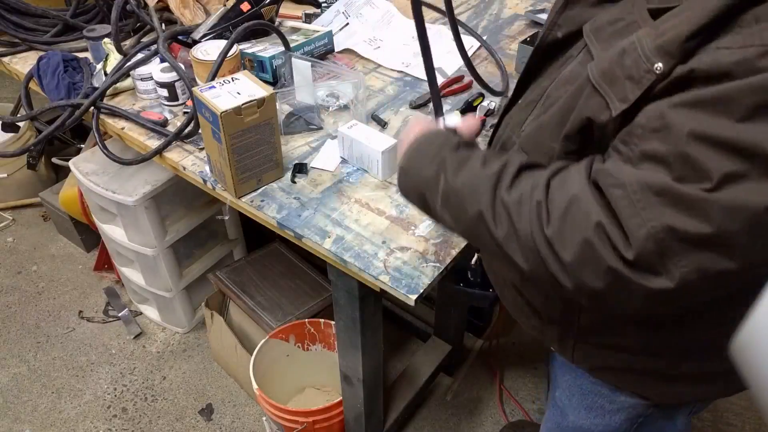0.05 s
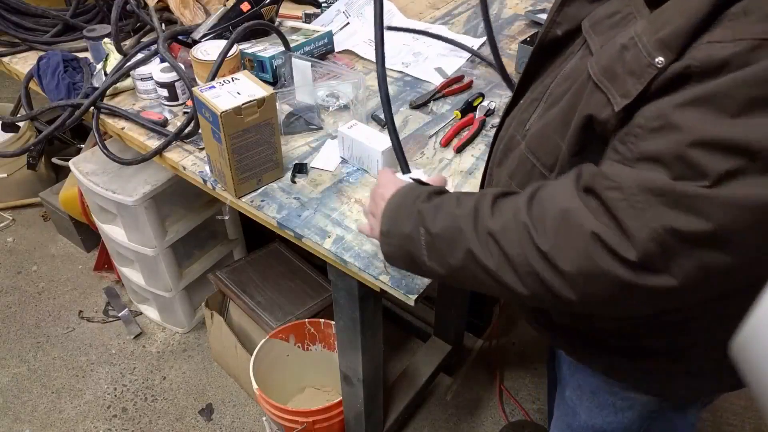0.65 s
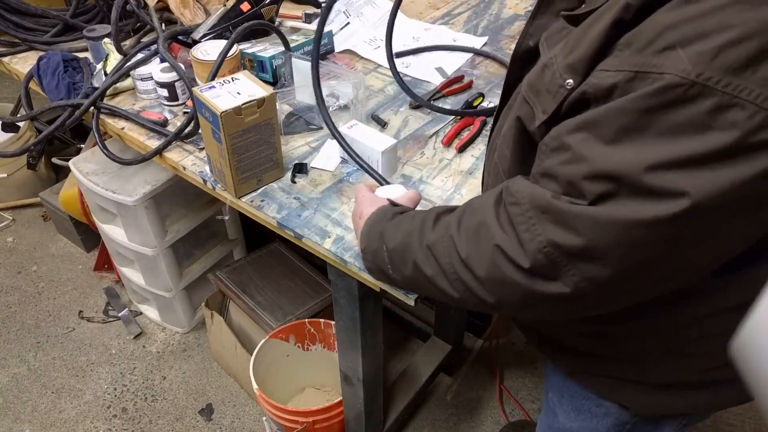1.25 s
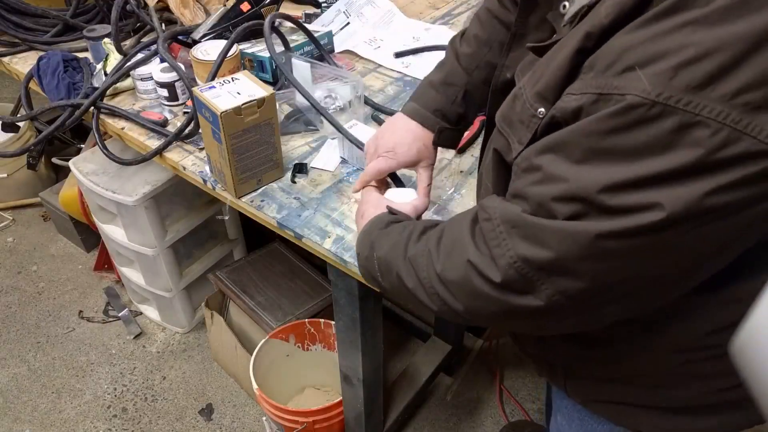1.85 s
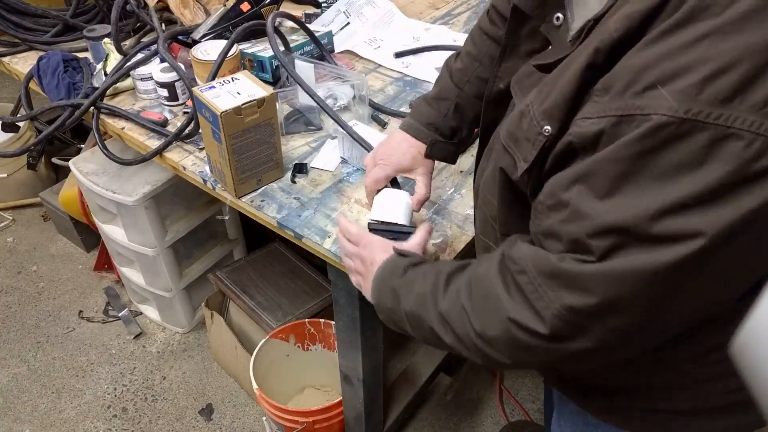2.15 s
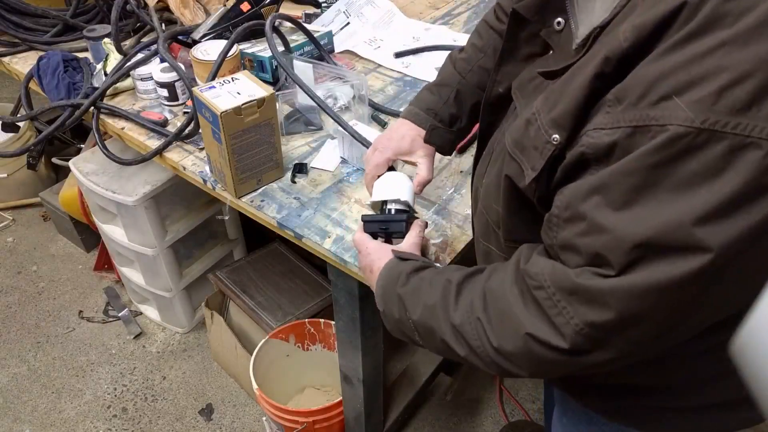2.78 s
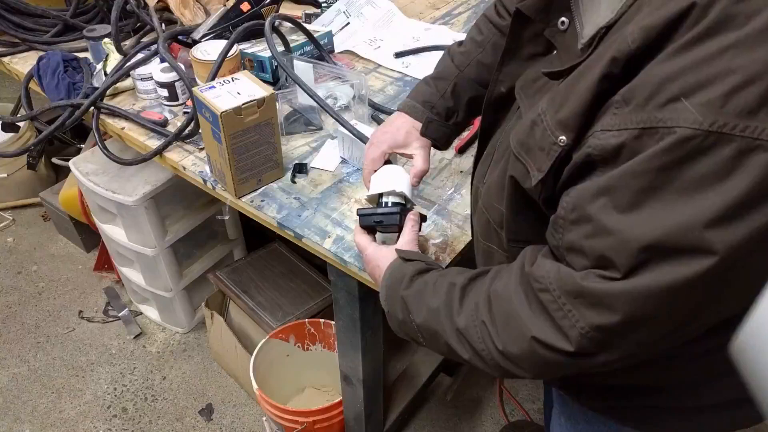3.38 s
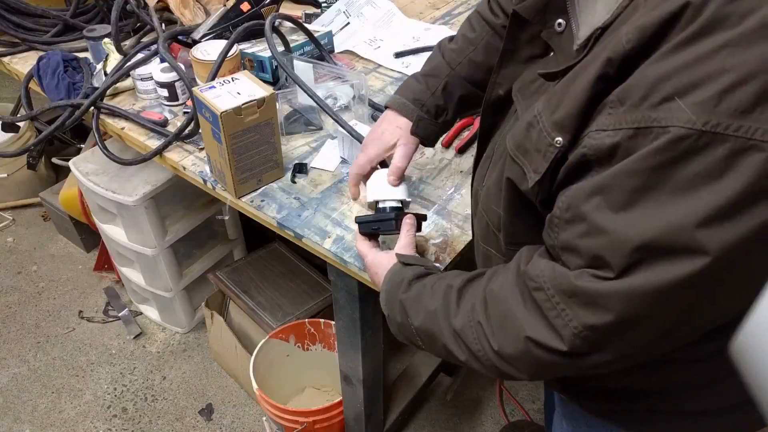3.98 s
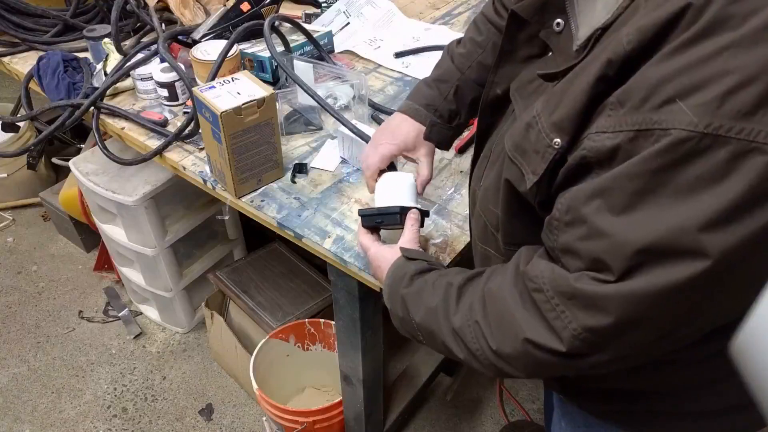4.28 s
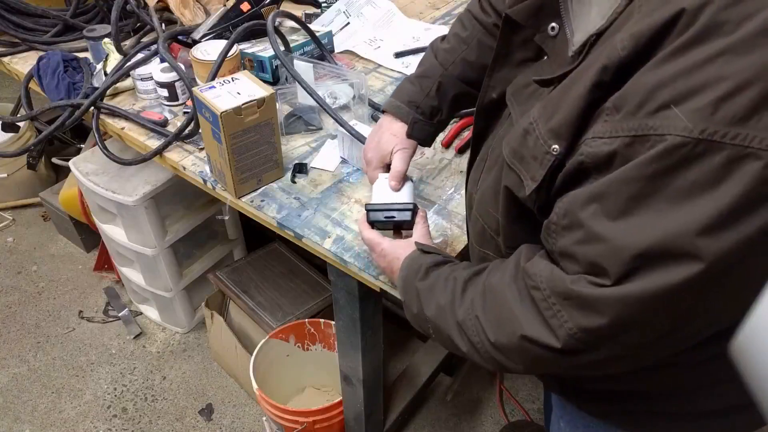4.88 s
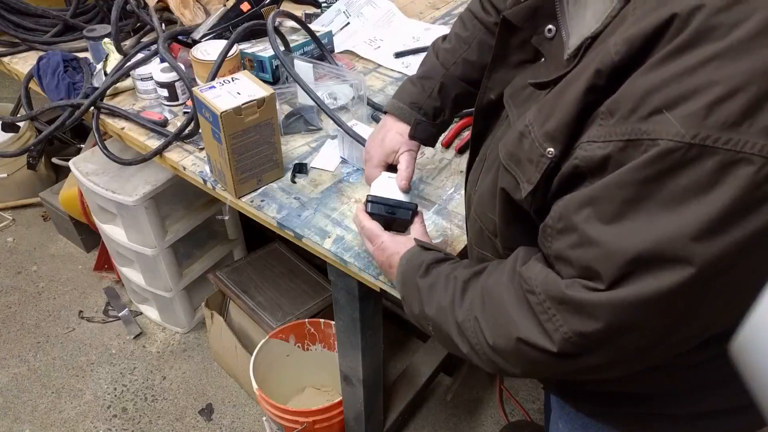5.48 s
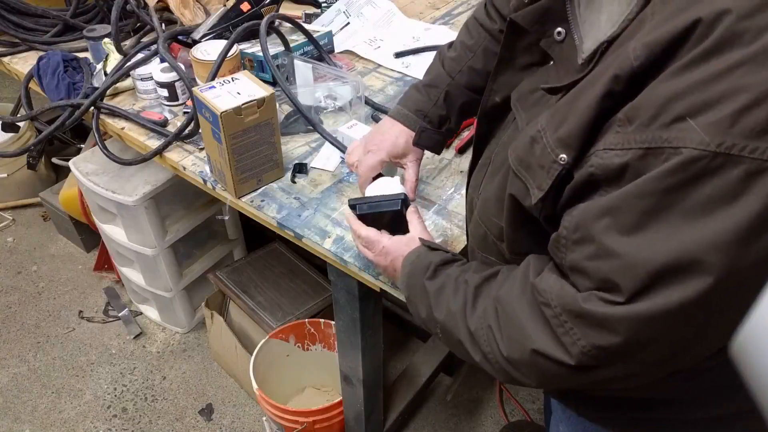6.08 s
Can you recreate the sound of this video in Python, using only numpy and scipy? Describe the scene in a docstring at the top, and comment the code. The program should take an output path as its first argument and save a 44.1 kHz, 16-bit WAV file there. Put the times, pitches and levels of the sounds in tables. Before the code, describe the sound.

A jacket sleeve swishes, then hard plastic knocks on a workbench and clicks as an electrical socket is pressed into its housing.

```python
"""A jacket sleeve zips and a thick cable rustles; then an electrical socket is knocked against a
workbench and pressed into a plastic housing. Each contact snaps and rings the hollow plastic briefly;
knocks also set the bench booming and its top clattering. Fingers rub the housing between the clicks.
The small workshop answers over a low hum and the thin whine of an electronic power supply."""
import sys
import numpy as np
from scipy import signal
from scipy.fft import next_fast_len
from scipy.io import wavfile

SR = 44100
rng = np.random.default_rng(int(sys.argv[2]) if len(sys.argv) > 2 else 0)


def output_pcm(signal):
    """Save a mono or channel-first signal as 16-bit PCM at the path in sys.argv[1].

    Samples are clipped to [-1, 1] before scaling.
    """
    pcm = np.clip(np.atleast_2d(signal).T, -1, 1) * 32767
    wavfile.write(sys.argv[1], SR, np.round(pcm).astype(np.int16))


N = 275404
TIME = np.arange(N) / SR
TAIL, BRIEF = TIME[:SR], TIME[:4096]  # time axes for long and short rings


def amp(db):
    """Turns dB into gain."""
    return 10 ** (np.asarray(db) / 20)

def unit_energy(x):
    """Scales to energy 1."""
    return x / np.sqrt(np.sum(x ** 2) + 1e-20)

def unit_rms(x):
    """Scales to rms 1."""
    return unit_energy(x) * np.sqrt(len(x))

def curve(table, hz, column=1):
    """Reads one column of a spectrum table along a log-frequency axis."""
    table = np.array(table)
    return np.interp(np.log(hz + 1), np.log(table[:, 0] + 1), table[:, column])

def add(mix, start_s, sound):
    """Mixes a sound in at its start time."""
    part = mix[max(round(start_s * SR), 0):][:len(sound)]
    part += sound[:len(part)]

def equalise(x, eq):
    """Minimum-phase EQ: nothing sounds ahead of an attack."""
    size = next_fast_len(len(x) + 2048)
    log_gain = np.log(amp(curve(eq, abs(np.fft.fftfreq(size, 1 / SR)))))
    response = np.exp(np.conj(signal.hilbert(log_gain)))
    return np.fft.ifft(np.fft.fft(x, size) * response).real[:len(x)]

def fuzzy_tone(hz, width_hz):
    """Noise of rms 1 in a narrow resonance that may glide."""
    pole = np.exp(-np.pi * width_hz / SR)
    noise = rng.standard_normal(N) + 1j * rng.standard_normal(N)
    drift = signal.lfilter([1 - pole], [1, -pole], signal.lfilter([1 - pole], [1, -pole], noise))
    carrier = np.exp(2j * np.pi * np.cumsum(hz * np.ones(N)) / SR)
    return unit_rms((drift * carrier).real)

def stroke(start_s, swell_s, hold_s, release_s):
    """Envelope of one movement: a quarter-sine swell, a hold, and a 60 dB fall over the release."""
    t = TIME - start_s
    swell = np.sin(np.pi / 2 * np.clip(t / swell_s, 0, 1))
    return swell * amp(-60 * np.maximum(t - swell_s - hold_s, 0) / release_s)

def ring(modes, rise_s, detune=0., uneven_db=0., t=BRIEF):
    """Dying sines of total energy 1; grip and point of contact can shift their pitch and balance."""
    waves = np.zeros(len(t))
    for k, (hz, db, t60) in enumerate(modes):
        pitch_shift, level_shift = rng.uniform(-1.07, 1, 2)
        decay = amp(db + uneven_db * level_shift - 60 * t / t60)
        waves += (-1) ** k * decay * np.sin(2 * np.pi * hz * (1 + detune * pitch_shift) * t)
    return unit_energy(waves * (1 - np.exp(-t / rise_s)))

def dense_ring(bands, rise_s):
    """Countless modes blur into noise, each band dying at its own speed."""
    hz, t, spectrum = signal.stft(rng.standard_normal(SR), SR, nperseg=512)
    t60 = curve(bands, hz, column=2)[:, None]
    spectrum *= amp(curve(bands, hz)[:, None] - 60 * t / t60)
    spectrum *= np.sqrt(2 * np.log(1000) / (t60 * SR))  # long and short decays carry equal energy
    return signal.istft(spectrum, SR, nperseg=512)[1][:SR] * (1 - np.exp(-TAIL / rise_s))


# Room tone EQ: freq_hz, gain_db
AIR_EQ = [(25, -6), (55, -0.5), (85, 1), (120, 3), (150, -3), (300, -8.5), (550, -13), (850, -12.5),
          (1200, -17.5), (2000, -19.5), (3000, -25.5), (5500, -26.5), (9000, -27), (16000, -28)]

def room_air(level_db=-60.46):
    """A soft, bass-heavy bed of noise."""
    return amp(level_db) * unit_rms(equalise(rng.standard_normal(N), AIR_EQ))

# Hum tones: pitch_hz, level_db
HUM_TONES = [(118.4, -75), (1443, -79), (2159, -83), (2283, -84)]

def hum():
    """A low, wavering hum with three fainter tones above it."""
    return sum(amp(db) * fuzzy_tone(hz, width_hz=18) for hz, db in HUM_TONES)

# Thin whistles of the electronics: pitch_hz, level_db
WHISTLE_TONES = [(11310, -85), (15100, -86), (15165, -98)]

def power_supply(whine_hz=7701, whine_db=-72, sweep_hz=228, mains_hz=60):
    """A whine whose pitch swings with the mains, under faint steady whistles."""
    vibrato = sweep_hz / mains_hz * np.sin(2 * np.pi * mains_hz * TIME)
    whine = amp(whine_db) * np.sin(2 * np.pi * whine_hz * TIME + vibrato)
    whistles = sum(amp(db) * np.sin(2 * np.pi * hz * TIME) for hz, db in WHISTLE_TONES)
    return np.sqrt(2) * (whine + whistles)  # levels are rms

# Workshop reverb: freq_hz, gain_db, t60_s
REVERB_BANDS = [(100, 4, 1), (393, 3, 0.68), (870, -1, 0.38), (1480, -6, 0.39), (2730, -7, 0.32),
                (3200, 7, 0.37), (6650, 1, 0.37), (10100, 4, 0.3), (16300, -1, 0.3)]
# Early reflections off near surfaces: delay_s, gain
REFLECTIONS = [(.0011, 0.091), (.0078, 0.16), (0.0132, 0.14), (0.0167, .22), (.0255, 0.051)]

def workshop(rays, send_db):
    """The first ray of sound arrives directly and off near surfaces; all rays feed the reverb."""
    reverb = sum(signal.fftconvolve(ray, dense_ring(REVERB_BANDS, rise_s=0.004)) for ray in rays)
    out = amp(send_db) / np.sqrt(len(rays)) * reverb
    add(out, 0, rays[0])
    for delay_s, gain in REFLECTIONS:
        add(out, delay_s * rng.uniform(0.94, 1.06), gain * rays[0])
    return out

def friction(strokes, eq, grain_db, grains_per_s, band_hz, release_s):
    """Tiny slips of uneven size over hiss; each stroke swells and dies away, levelled within band_hz."""
    slips = rng.standard_normal(N) * (rng.random(N) < grains_per_s / SR)
    slips *= amp(grain_db * np.minimum(rng.exponential(1, N), 4))
    texture = equalise(slips + 0.36 * rng.standard_normal(N), eq)
    band = signal.butter(4, band_hz, "band", fs=SR, output="sos")
    texture /= np.std(signal.sosfilt(band, texture))
    power = sum((amp(db) * stroke(start, swell, 0, release_s)) ** 2 for start, swell, db in strokes)
    return texture * np.sqrt(power)

# Finger strokes: start_s, swell_s, peak_db (before the trim)
RUB_STROKES = [(-0.05, 0.083, -59), (2.25, 0.051, -61), (2.45, 0.034, -59), (3.57, 0.025, -65.5),
               (3.8, 0.026, -61.5), (4.6, 0.056, -62), (5.1, 0.026, -62.5), (5.55, 0.097, -61.5),
               (5.68, 0.22, -57.5), (5.95, 0.026, -48), (5.98, 0.12, -57), (6.08, 0.14, -55.5)]
# Their dull tone: freq_hz, gain_db
RUB_EQ = [(80, -3), (200, 5), (400, -0.5), (700, 3), (1100, -3), (1550, -3.5), (2100, -6.5), (2600, -9.5),
          (3200, -24), (8000, -38)]

def finger_rubs(trim_db=-3.5):
    """Fingers catch and slip on the hollow housing in coarse grains."""
    return amp(trim_db) * friction(RUB_STROKES, RUB_EQ, grain_db=4, grains_per_s=470,
                                   band_hz=(400, 2000), release_s=0.42)

# Sleeve and cable slides: start_s, swell_s, peak_db (before the trim)
SLIDE_STROKES = [(-0.15, 0.29, -45), (0.15, 0.17, -50.5), (0.33, 0.22, -48.5), (0.8, 0.16, -62),
                 (1.62, 0.12, -63), (1.95, 0.15, -55.5), (2.22, 0.092, -56.5), (2.46, 0.023, -60.5),
                 (4.01, 0.045, -70), (4.16, 0.11, -63.5), (4.6, 0.067, -60.5), (5.83, 0.061, -57.5),
                 (5.95, 0.23, -68)]
# Their bright tone: freq_hz, gain_db
SLIDE_EQ = [(150, -0.5), (900, -10.5), (1900, -6), (2650, 2.5), (3050, -9), (4000, -1.5), (5500, -1),
            (6500, -0.5), (7600, -4.5), (10000, -10), (16000, -13)]

def rustle(trim_db=-3.5):
    """Cloth and cable slide with a fine-grained hiss."""
    return amp(trim_db) * friction(SLIDE_STROKES, SLIDE_EQ, grain_db=-1, grains_per_s=3900,
                                   band_hz=(3000, 7000), release_s=0.64)

# Hiss bands of the weave: pitch_hz (at speed 1), width_hz, relative_db
WEAVE_BANDS = [(2710, 88, -16), (3510, 410, -0.5), (5540, 660, 5), (6500, 330, -4.5), (9670, 990, -7.5),
               (13400, 900, -11)]

def sleeve_zip(level_db=-43.5, slowing_per_s=0.1):
    """Weave runs over weave in one fast stroke: bands of hiss sink in pitch as the arm slows."""
    speed = 1.03 - slowing_per_s * TIME
    hiss = sum(amp(db) * fuzzy_tone(hz * speed, width_hz) for hz, width_hz, db in WEAVE_BANDS)
    envelope = stroke(start_s=-0.017, swell_s=0.1, hold_s=0.11, release_s=0.52)
    return amp(level_db) * envelope * unit_rms(hiss)

# Tick of a loose part: start_s, pitch_hz, dry_energy_db, t60_s
TICKS = [(1.956, 4190, -17, 0.016)]

def loose_part():
    """A small part ticks as a knock settles: one high mode, carried on by the room."""
    out = np.zeros(N)
    for start_s, hz, db, t60 in TICKS:
        tick = ring([(hz, 0, t60)], rise_s=0.00037)
        add(out, start_s, amp(db) * workshop([tick], send_db=-0.5))
    return out

# Low, middle and high modes of the plastic: pitch_hz, relative_db, t60_s
BODY_MODES = [(198, -14, 0.018), (308, -19, 0.034), (502, -5.5, 0.013), (646, -2, 0.022),
              (776, -0.5, 0.016), (932, -7, 0.035), (1144, -1.5, 0.013)]
CAVITY_MODES = [(1286, -13, 0.021), (1480, 6, 0.01), (1540, -3.5, 0.07), (1654, -6.5, 0.049),
                (1940, 6, 0.0089)]
RIM_MODES = [(2137, 0.5, 0.02), (2178, -4, 0.02), (2385, -8, 0.0047), (2580, 8, 0.019), (2680, 3, 0.012)]
# Tone of the snap: freq_hz, gain_db
SNAP_EQ = [(300, -28), (1500, -3), (2700, 7.5), (3100, -12.5), (4000, -6.5), (4700, -1.5), (6300, 0),
           (7200, -1.5), (8300, -12.5), (11000, -12.5), (16000, -21.5)]

def plastic_contact(body_db, cavity_db, rim_db, snap_db, snap_s=0.0038):
    """A brief crackle as the edges slip, and the short ring of the hollow plastic."""
    burst = rng.standard_normal(len(BRIEF)) * np.exp(-BRIEF / snap_s)
    snap = unit_energy(equalise(burst, SNAP_EQ))
    body = ring(BODY_MODES, rise_s=0.0001, detune=0.017, uneven_db=5)
    cavity = ring(CAVITY_MODES, rise_s=0.00016, detune=0.018, uneven_db=13.5)
    rim = ring(RIM_MODES, rise_s=0.00024, detune=0.0095)
    return amp(body_db) * body + amp(cavity_db) * cavity + amp(rim_db) * rim + amp(snap_db) * snap

def plastic_hit(strength_db, pitch_hz, rolloff_db_per_octave, snap_offset_db):
    """A hit favours the modes nearest its pitch and sounds a little different in each direction."""
    centres_hz = np.array([740, 1660, 2620])  # body, cavity, rim
    modes_db = strength_db - rolloff_db_per_octave * abs(np.log2(centres_hz / pitch_hz))
    rays = [plastic_contact(*modes_db, strength_db + snap_offset_db) for _ in range(3)]
    return workshop(rays, send_db=3.5)

def air_push(centre_hz=1140, delay_s=0.00131):
    """One swing of pressure as a knock bottoms out."""
    u = np.pi * centre_hz * (BRIEF - delay_s)
    return unit_energy((1 - 2 * u ** 2) * np.exp(-u ** 2))

# Boom of the bench frame and clear ring of its top: pitch_hz, relative_db, t60_s
FRAME_MODES = [(98.2, 3.5, 0.43), (126.6, 0, 0.3), (152.8, -3.5, 0.4), (220.6, 1.5, 0.75), (232, 5, 0.57),
               (252.3, 10.5, 0.2)]
TOP_MODES = [(466, 6.5, 0.43), (664, -5, 0.33), (820, -21, 0.33), (854, 3, 0.62), (1027, 5.5, 0.5),
             (1243, 9, 0.19), (1260, 6.5, 0.18), (1446, 3.5, 0.2)]
# Clatter of the top and the things lying on it: freq_hz, relative_db, t60_s
CLATTER_BANDS = [(50.6, -41, 0.79), (104, -2, 1.34), (218, -0.5, 1), (456, -1.5, 0.61), (980, -1, 0.49),
                 (1610, -6, 0.56), (2270, -7, 0.61), (3320, -17, 0.53), (7340, -30.5, 1.2),
                 (16100, -37, 0.79)]
# Plastic on bench: start_s, strength_db, pitch_hz, rolloff_db_per_octave, snap_offset_db, boom_db, top_db
KNOCK_CUES = [(0.9812, -2, 1500, 12, -14, 6, -0.5), (1.1764, -7.5, 1550, 18, -1, -7, 3),
              (1.283, -13, 2500, 0, -32, -2.5, -5.5), (1.322, -14.5, 750, 8, -32, -17, -28),
              (1.7303, -10.5, 750, 7, -20, -10.5, -12.5), (1.8054, -0.5, 1210, 5.5, -21, -13.5, 6.5),
              (1.864, -8.5, 750, 9, -15, -32, -6.5), (2.078, -28, 750, 3, -16, -15.5, -19.5)]

def bench_knocks(push_offset_db=-6, ring_offset_db=-7):
    """The plastic strikes the bench with a short push of air; the frame booms and the top rings on."""
    out = np.zeros(N)
    boom = ring(FRAME_MODES, rise_s=0.016, t=TAIL)
    top_ring = amp(ring_offset_db) * ring(TOP_MODES, rise_s=0.0014, t=TAIL)
    for start_s, strength_db, *timbre, boom_db, top_db in KNOCK_CUES:
        add(out, start_s, plastic_hit(strength_db, *timbre))
        add(out, start_s, amp(strength_db + push_offset_db) * air_push())
        add(out, start_s, amp(boom_db) * boom)
        clatter = unit_energy(dense_ring(CLATTER_BANDS, rise_s=0.00078))
        add(out, start_s, amp(top_db) * (clatter + top_ring))
    return out

# Plastic on plastic: start_s, strength_db, pitch_hz, rolloff_db_per_octave, snap_offset_db
CLICK_CUES = [(0.6368, -5, 1500, 14, -8), (0.6457, -13, 1430, 16, -21), (0.775, -25, 1600, 22, -9.5),
              (1.0211, 0.5, 1830, 24, -17.5), (1.171, -19, 2500, 12, 0), (1.197, -17, 750, 13, -19),
              (1.8225, -16, 750, 0, 0.5), (1.8745, -5, 750, 11, -25), (2.164, -18, 1570, 16, -10.5),
              (3.841, -28.5, 2310, 13, -7.5), (4.2698, -14.5, 1930, 8, -2), (4.328, -22, 1900, 11, -11),
              (4.4537, -31.5, 1580, 19, -5), (5.2002, -28, 2500, 4, -7), (5.2059, -14.5, 2500, 1.5, 0),
              (5.3749, -14, 1400, 1.5, -13), (5.3913, -2, 2680, 9.5, -13), (5.505, -24, 750, 16, -9),
              (5.849, -27, 2500, 7, -15), (5.8709, -21, 750, 1.5, -15), (5.975, -24.5, 750, 7, -30)]

def socket_clicks():
    """The socket catches and seats in its housing."""
    out = np.zeros(N)
    for start_s, *hit in CLICK_CUES:
        add(out, start_s, plastic_hit(*hit))
    return out

def scene():
    """All sources at one microphone, the same on both channels."""
    impacts = socket_clicks() + bench_knocks() + loose_part()
    handling = sleeve_zip() + rustle() + finger_rubs()
    background = room_air() + hum() + power_supply()
    mono = impacts + handling + background
    return np.array([mono, mono])

def record(dry, low_cut_hz=46, high_cut_hz=15950):
    """Thins the deep bass and cuts the very top steeply."""
    low_cut = signal.butter(3, low_cut_hz, "high", fs=SR, output="sos")
    high_cut = signal.firwin(511, high_cut_hz, window=("kaiser", 9), fs=SR)
    return signal.oaconvolve(signal.sosfilt(low_cut, dry), high_cut[None], "same")


dry = scene()
out = record(dry)
output_pcm(out)
```